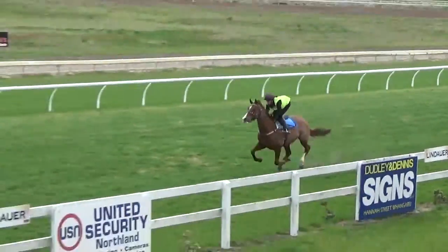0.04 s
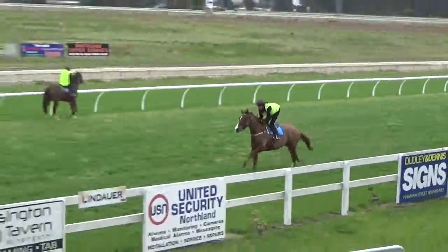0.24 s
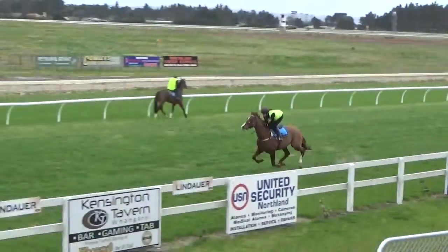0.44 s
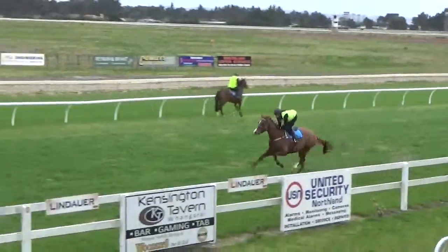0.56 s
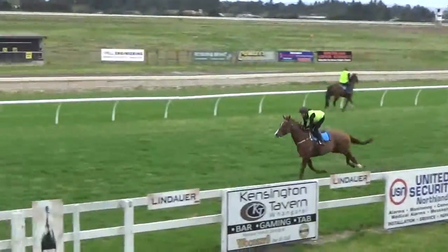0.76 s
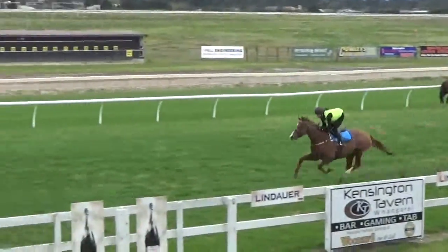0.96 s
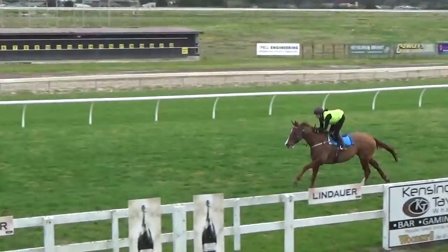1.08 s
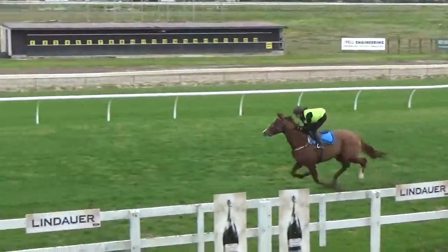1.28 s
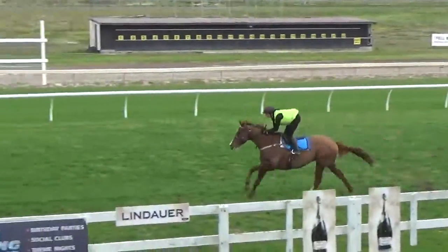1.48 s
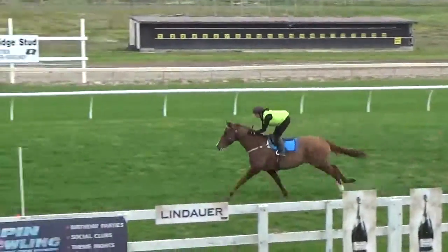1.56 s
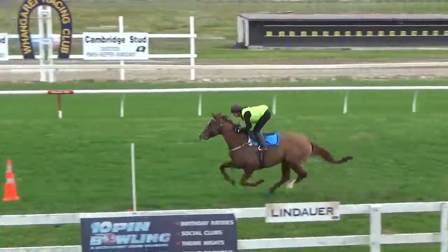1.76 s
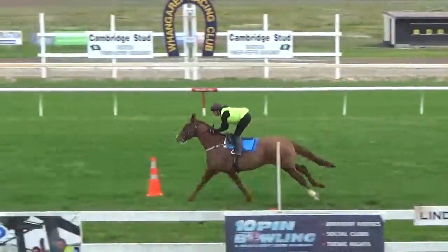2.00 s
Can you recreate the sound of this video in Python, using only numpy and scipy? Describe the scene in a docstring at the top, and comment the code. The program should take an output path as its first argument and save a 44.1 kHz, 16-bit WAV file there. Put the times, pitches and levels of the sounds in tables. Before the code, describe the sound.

A galloping horse's hooves thud and clack on turf, with buffeting wind and twittering birds

```python
"""From the start, wind buffets two microphones as noisy lumps and rumble, with tearing bursts and a roar.
Small birds twitter at once, stronger on the right: gliding whistles over an echoing blur of many calls.
A galloping horse enters with a knock: damped sines thud, ringing taps knock, and noise puffs hoarsely.
A hard clack follows; from about 0.7 s each hoof also swishes more clearly through the grass, as fading noise.
Heavy thuds, knocks and clacks keep coming to the end at two seconds."""
import sys
import numpy as np
from scipy import signal
from scipy.fft import rfft, irfft, next_fast_len
from scipy.io import wavfile
from scipy.ndimage import uniform_filter1d

SR = 44100
rng = np.random.default_rng(int(sys.argv[2]) if len(sys.argv) > 2 else 0)


def convert_level_to_amplitude(level_db):
    """Map a level in decibels to its linear amplitude factor."""
    exponent = np.asarray(level_db, float) / 20
    return 10 ** exponent


def dump_mix(stems):
    """Bounce the given channels to the path in sys.argv[1] as a 16-bit WAV at rate SR."""
    frames = np.atleast_2d(stems).T  # one column per channel
    limited = np.clip(frames, -1, 1)  # hard clip at full scale
    pcm = np.round(limited * 32767).astype(np.int16)
    wavfile.write(sys.argv[1], SR, pcm)


N = 89655  # samples, about 2.03 s


def evened(x):
    """Scales a signal to rms 1."""
    return x / np.sqrt(np.mean(x ** 2) + 1e-20)


def read(points, hz):
    """Reads a frequency table by interpolating over log frequency."""
    f, value = np.transpose(points)
    return np.interp(np.log(hz + 1), np.log(f + 1), value)


def curve(table, column):
    """Turns a level column into a gain envelope, interpolated in dB over time."""
    rows = np.array(table)
    return convert_level_to_amplitude(np.interp(np.arange(N) / SR, rows[:, 0], rows[:, column]))


def add(mix, start_s, sound):
    """Mixes a sound in at its start time, cut off at the end of the mix."""
    part = mix[..., max(round(start_s * SR), 0):][..., :sound.shape[-1]]
    part += sound[..., :part.shape[-1]]


def coloured(x, gain):
    """Filters a sound by a gain given as a function of Hz."""
    size = next_fast_len(x.shape[-1])
    hz = np.fft.rfftfreq(size, 1 / SR)
    return irfft(rfft(x, size) * gain(hz), size)[..., :x.shape[-1]]


# likeness of the two microphones: frequency_hz, likeness (0 to 1)
MIC_LIKENESS = [(30, 0.38), (80, 0.85), (160, 0.39), (320, 0.23), (640, 0.16), (1300, 0.95), (2600, 0.41),
                (5200, 0.42), (11000, 1)]
# how far the left microphone leads the right: frequency_hz, lead_rad
LEFT_LEAD = [(30, 1.4), (120, 0), (260, 0.8), (520, 2.5), (1290, 2.5), (1980, 0.7), (4310, -7), (7580, -9),
             (11100, -12)]


def pair(a, b):
    """Makes left and right from two unrelated signals, as alike at each frequency as the microphones are."""
    def likeness(hz):
        return np.clip(read(MIC_LIKENESS, hz), -1, 1)

    shared = coloured(a, lambda hz: likeness(hz) * np.exp(-1j * read(LEFT_LEAD, hz)))
    separate = coloured(b, lambda hz: np.sqrt(1 - likeness(hz) ** 2))
    return np.array([a, shared + separate])


def hiss(spectrum, patchy_db):
    """Stereo noise of one spectrum, rms 1, whose bands swell and fade in drifting patches."""
    likeness = 0.78  # between left and right, before the patches
    a, b = rng.standard_normal((2, N))
    stereo = np.array([a, likeness * a + np.sqrt(1 - likeness ** 2) * b])
    shaped = coloured(stereo, lambda hz: convert_level_to_amplitude(read(spectrum, hz)))
    bins = signal.stft(shaped, nperseg=512)[2]
    patches = rng.standard_normal(bins.shape[1:])
    patches = uniform_filter1d(patches, size=6, axis=0)  # over frequency
    patches = evened(uniform_filter1d(patches, size=10, axis=1))  # over time
    return evened(signal.istft(bins * convert_level_to_amplitude(patchy_db * patches), nperseg=512)[1][:, :N])


def burst(hz, width_hz, t60_s, tap=6.2):
    """A tap and a short dying noise excite one steep resonance, scaled to peak 1."""
    t = np.arange(4000) / SR
    drive = rng.standard_normal(len(t)) * convert_level_to_amplitude(-60 * t / t60_s)
    drive[0] = tap
    radius = np.exp(-np.pi * width_hz / SR)
    poles = [1, -2 * radius * np.cos(2 * np.pi * hz / SR), radius * radius]
    no_treble = signal.lfilter([1, 1], poles, drive)
    ring = signal.lfilter([1, -1], poles, no_treble)  # second pass, which also blocks DC
    return ring / abs(ring).max()


# hoof falls, levels before the stereo mix: start_s, thud_level_db, knock_level_db, swish_level_db
HOOF_FALLS = [(0.135, -38, -26.5, -64), (.38, -28, -45, -58), (.463, -10.5, -43, -59),
              (0.526, -30, -36, -59), (.553, -18, -39, -59), (.697, -20.5, -51, -40.5),
              (.773, -28, -47, -44), (.788, -12.5, -40, -42), (.911, -25, -44, -40), (0.936, -24, -51, -40),
              (1.11, -16.5, -35, -42), (1.185, -14, -38, -30.5), (1.195, -16.5, -27, -48),
              (1.261, -18.5, -31, -46), (1.338, -20, -35, -54), (1.519, -16.5, -25, -32),
              (1.598, -11, -41, -34.5), (1.6044, -11, -17, -47), (1.673, -17.5, -36, -60),
              (1.702, -16.5, -20, -64), (1.936, -25.5, -41, -31), (2.0179, -14.5, -28, -30)]


def hoof_blows():
    """Each hoof makes the turf thud as a damped sine, with a body resonance and a higher knock."""
    THUD_HZ, THUD_T60_S, THUD_RISE_S = 118, 0.06, 0.0006
    BODY_HZ, BODY_WIDTH_HZ, BODY_DB = 481, 320, -7  # level relative to the thud
    KNOCK_HZ, KNOCK_WIDTH_HZ, STRIKE_T60_S = 940, 640, 0.028
    t = np.arange(4000) / SR
    rise = 1 - np.exp(-t / THUD_RISE_S)
    thud = np.sin(2 * np.pi * THUD_HZ * t) * rise * convert_level_to_amplitude(-60 * t / THUD_T60_S)
    thud /= thud.max()
    blows = np.zeros(N)
    for start_s, thud_db, knock_db, _ in HOOF_FALLS:
        add(blows, start_s, convert_level_to_amplitude(thud_db) * thud)
        add(blows, start_s, convert_level_to_amplitude(knock_db) * burst(KNOCK_HZ, KNOCK_WIDTH_HZ, STRIKE_T60_S))
        add(blows, start_s, convert_level_to_amplitude(thud_db + BODY_DB) * burst(BODY_HZ, BODY_WIDTH_HZ, STRIKE_T60_S))
    return blows


# colour of the grass noise: frequency_hz, relative_level_db (per Hz)
GRASS_COLOUR = [(880, -32), (1500, 4), (3190, -4), (6460, -7), (9880, -2.5), (10900, -4.5), (11400, -79),
                (14800, -55), (22000, -120)]
# legs brushing through the grass, before the patches of hiss: start_s, level_db
LEG_BRUSH = [(0.0, -84), (0.42, -61), (1.01, -57), (1.13, -51.5), (1.26, -54), (1.41, -54), (2.03, -53)]


def grass():
    """Grass noise swishes up just ahead of each hoof and dies away, over a steadier brushing of legs."""
    LEAD_S, T60_S, GRIT_DB = 0.004, 0.055, 2.5
    t = np.arange(4000) / SR
    swish = np.zeros(N)
    for start_s, _, _, swish_db in HOOF_FALLS:
        rise = np.minimum(t / LEAD_S, 1)
        add(swish, start_s - LEAD_S, convert_level_to_amplitude(swish_db - 60 * t / T60_S) * rise)
    steps = rng.standard_normal(N // 64 + 1).repeat(64)[:N]  # a new level every 64 samples
    grit = convert_level_to_amplitude(GRIT_DB * steps)
    return hiss(GRASS_COLOUR, patchy_db=2.5) * (swish * grit + curve(LEG_BRUSH, column=1))


# sharp clacks, perhaps shoe on shoe, levels before the stereo mix:
# start_s, ring_level_db, ring_hz, treble_level_db
SHOE_CLACKS = [(0.3178, -15, 1200, -28), (.381, -31, 1500, -32), (.788, -23.5, 1510, -35),
               (1.185, -27, 2200, -33), (1.6045, -24, 2000, -33), (1.7629, -16, 2430, -23),
               (1.7672, -34, 2430, -29), (2.0164, -18, 2130, -29)]


def clacks():
    """Each clack is a hard tap on a ringing resonance, with a bright tick kept as a separate layer."""
    RING_WIDTH_HZ, TICK_HZ, TICK_WIDTH_HZ, T60_S = 1500, 9800, 4000, 0.016
    rings, ticks = np.zeros((2, N))
    for start_s, ring_db, ring_hz, treble_db in SHOE_CLACKS:
        add(rings, start_s, convert_level_to_amplitude(ring_db) * burst(ring_hz, RING_WIDTH_HZ, T60_S, tap=9))
        add(ticks, start_s, convert_level_to_amplitude(treble_db) * burst(TICK_HZ, TICK_WIDTH_HZ, T60_S))
    return rings, ticks


def horse():
    """Hoof blows and clacks sit near the centre with a little microphone difference, grass around them."""
    rings, ticks = clacks()
    blows = hoof_blows() + rings
    spread = pair(blows, np.zeros(N))
    return 0.14 * spread + 0.85 * blows + ticks + grass()


# hoarse puffs, about one a stride, probably the horse blowing: start_s, length_s, level_db (at the crest)
HORSE_PUFFS = [(0.01, 0.15, -48), (0.398, 0.16, -41), (0.74, 0.14, -39), (0.869, 0.093, -37),
               (1.232, 0.13, -35.5), (1.634, 0.18, -37)]
# colour of the puffs: frequency_hz, relative_level_db (per Hz)
PUFF_COLOUR = [(300, -30), (500, 2.5), (800, -1), (1150, 2), (1600, -4), (2300, -1), (3000, -10),
               (4000, -30)]


def puffs():
    """Each puff is coloured noise that swells and fades along half a sine."""
    level = np.zeros(N)
    for start_s, length_s, db in HORSE_PUFFS:
        swell = np.sin(np.pi * np.arange(0, length_s, 1 / SR) / length_s)
        add(level, start_s, convert_level_to_amplitude(db) * swell)
    return hiss(PUFF_COLOUR, patchy_db=2.5) * level


# wind strength: start_s, rumble_level_db, flutter_level_db, roar_level_db
WIND_LEVELS = [(0.0, -29, -22.5, -39), (0.16, -26, -18, -40.5), (0.23, -21, -24, -40),
               (0.29, -15.5, -17.5, -40.5), (0.32, -16, -25.5, -42.5), (0.36, -48, -15, -39.5),
               (0.57, -20.5, -22.5, -43.5), (0.61, -35, -26, -43), (0.64, -13, -24, -42),
               (0.66, -24.5, -25, -39.5), (0.76, -21.5, -34.5, -40.5), (0.8, -22.5, -17, -39),
               (0.92, -34.5, -28.5, -41), (0.98, -21.5, -30, -42), (1.08, -27.5, -37.5, -40.5),
               (1.49, -25, -30, -36.5), (1.53, -23.5, -37, -39), (1.55, -25, -23, -40),
               (1.6, -18.5, -26, -38), (1.8, -28, -32, -36), (1.99, -33.5, -33, -39), (2.03, -45, -28, -40)]
# colour of the gusts on the microphones: frequency_hz, relative_level_db (per Hz)
GUST_COLOUR = [(12, -44), (20, -28), (59, 0.5), (106, 3.5), (135, -0.5), (205, -1.5), (295, -7.5),
               (844, -33), (900, -28), (1170, -38), (1980, -120)]
# colour of the faint roar above: frequency_hz, relative_level_db (per Hz)
ROAR_COLOUR = [(240, -59), (400, -7), (473, -3.5), (784, -10), (1870, -15.5), (4280, -12), (7820, -28.5),
               (9930, -25), (11400, -36), (14800, -69), (22000, -120)]


def wind():
    """Eddies press on the microphones as lumps over a smooth rumble; a faint roar lies above."""
    LUMPS_PER_S, LUMP_SPREAD_DB, LUMP_SHARE, SPLIT_HZ = 250, 2, 0.45, 152.4
    sizes = convert_level_to_amplitude(LUMP_SPREAD_DB * np.minimum(rng.exponential(1, (2, N)), 4))
    lumps = (rng.random((2, N)) < LUMPS_PER_S / SR) * sizes
    smooth = rng.standard_normal((2, N))
    eddies = LUMP_SHARE * evened(lumps - lumps.mean()) + (1 - LUMP_SHARE) * smooth
    drive = pair(*eddies)

    def upper(hz):
        return hz ** 2 / (hz ** 2 + SPLIT_HZ ** 2)

    rumble = coloured(drive, lambda hz: convert_level_to_amplitude(read(GUST_COLOUR, hz)) * (1 - upper(hz)))
    flutter = coloured(drive, lambda hz: convert_level_to_amplitude(read(GUST_COLOUR, hz)) * upper(hz))
    gusts = evened(rumble) * curve(WIND_LEVELS, column=1) + evened(flutter) * curve(WIND_LEVELS, column=2)
    return gusts + hiss(ROAR_COLOUR, patchy_db=3) * curve(WIND_LEVELS, column=3)


# colour of the tearing bursts: frequency_hz, relative_level_db (per Hz)
TEAR_COLOUR = [(120, -15), (250, 14), (500, 1), (1000, -14), (1600, -19.5), (2500, -58)]


def tearing():
    """Eddies break in bursts of about 10 ms, mostly opposite left to right, following the flutter level."""
    LEVEL_DB, SPREAD_DB, OPPOSITE = -6.5, 7, 0.6  # level relative to the flutter
    a, b = rng.standard_normal((2, N))
    stereo = np.array([a, np.sqrt(1 - OPPOSITE ** 2) * b - OPPOSITE * a])
    swings = uniform_filter1d(rng.standard_normal(N), size=400)
    swings = evened(uniform_filter1d(swings, size=400))
    bursts = coloured(stereo * convert_level_to_amplitude(SPREAD_DB * swings), lambda hz: convert_level_to_amplitude(read(TEAR_COLOUR, hz)))
    return evened(bursts) * convert_level_to_amplitude(LEVEL_DB) * curve(WIND_LEVELS, column=2)


def note(length_s, first_hz, last_hz):
    """A hoarse, warbling whistle that arches around its glide between two nominal pitches."""
    WARBLE, ARCH, FLUTTER = 0.012, 0.018, 0.75  # shares of pitch, pitch and loudness
    u = np.arange(0, length_s, 1 / SR) / length_s
    slow_noise = uniform_filter1d(rng.standard_normal((2, 9000)), size=90)
    wobble, flutter = evened(slow_noise)[:, :len(u)]
    glide_hz = first_hz + (last_hz - first_hz) * u
    hz = glide_hz * (1 + WARBLE * wobble + ARCH * (np.sin(np.pi * u) - 0.7))
    envelope = np.sqrt(2) * np.sin(np.pi * u) ** 0.5 * (1 + FLUTTER * flutter)
    return envelope * np.sin(2 * np.pi * np.cumsum(hz) / SR)


# bird notes, and one faint high hiss near 9.5 kHz; nominal pitches, levels before panning and echo:
# start_s, length_s, first_hz, last_hz, level_db
BIRD_NOTES = [(0, 0.063, 3700, 3740, -44.5), (0.016, 0.031, 4200, 4320, -43),
              (0.172, 0.031, 5900, 5800, -43.5), (0.176, 0.04, 5240, 5360, -47.5),
              (.2, 0.1, 5840, 5000, -47.5), (.235, 0.04, 9540, 9400, -53), (0.233, 0.049, 4245, 4360, -40),
              (.3, 0.03, 3460, 3810, -38.5), (0.322, 0.035, 4370, 4260, -42), (.38, 0.049, 4545, 4260, -40),
              (.46, 0.05, 4700, 3950, -42), (0.485, 0.025, 6860, 6100, -50),
              (0.508, 0.026, 3150, 3300, -46.5), (0.58, 0.026, 5900, 5040, -51),
              (.59, .025, 4450, 4350, -44), (.607, .055, 4150, 2700, -42), (0.65, 0.044, 6030, 5900, -52),
              (0.691, 0.067, 5740, 4920, -40), (0.671, 0.033, 4400, 4210, -44), (.7, 0.04, 3000, 3050, -58),
              (.735, 0.033, 3910, 3554, -40.5), (.895, .025, 4170, 4200, -46),
              (0.79, 0.034, 3604, 3750, -41.5), (0.953, 0.06, 5300, 5400, -56),
              (1.018, 0.073, 5060, 5080, -45), (1.046, 0.061, 3950, 3944, -36.5),
              (1.056, 0.052, 6800, 6740, -51.5), (1.07, 0.092, 4500, 4280, -43),
              (1.117, 0.061, 3630, 2930, -41.5), (1.172, 0.052, 3400, 3140, -41.5),
              (1.177, 0.047, 5100, 5050, -44), (1.229, 0.059, 5050, 5050, -48),
              (1.531, 0.053, 4970, 5000, -48), (1.29, 0.039, 3950, 3860, -43),
              (1.335, .055, 3980, 3495, -41), (1.299, 0.09, 6950, 6530, -53),
              (1.324, .035, 5120, 4930, -51), (1.368, 0.035, 5070, 5050, -38),
              (1.386, 0.032, 3500, 3160, -37.5), (1.41, 0.055, 3500, 3135, -42),
              (1.46, 0.062, 4170, 3480, -45), (1.425, 0.043, 5010, 5040, -43),
              (1.469, 0.066, 5000, 5000, -46), (1.59, 0.036, 4580, 4660, -42),
              (1.688, 0.034, 4920, 5000, -44.5), (1.748, 0.054, 5070, 4970, -41),
              (1.807, 0.067, 4070, 4800, -46), (1.79, 0.028, 5050, 5050, -50),
              (1.885, 0.027, 5020, 5070, -52), (1.89, 0.041, 3580, 2913, -44),
              (1.91, 0.032, 5470, 5600, -54)]


def near_birds():
    """Bird notes, and one faint high hiss near 9.5 kHz, placed one by one as gliding tones."""
    near = np.zeros(N)
    for start_s, length_s, first_hz, last_hz, db in BIRD_NOTES:
        add(near, start_s, convert_level_to_amplitude(db) * note(length_s, first_hz, last_hz))
    return near


def flock(low_hz, high_hz):
    """Many short calls overlap, made by 120 voices of random glide that each repeat at random times."""
    CALLS_PER_S, GLIDE, VOICES = 500, 0.1393, 120
    calls = np.zeros(N)
    for hz in np.geomspace(low_hz, high_hz, num=VOICES):
        starts = rng.random(N) < CALLS_PER_S / VOICES / SR
        strikes = starts * convert_level_to_amplitude(2 * rng.standard_normal(N))
        glide = GLIDE * rng.uniform(-0.997, 0.43)  # most calls fall
        call = note(rng.uniform(0.015, 0.04), hz * (1 - glide), hz * (1 + glide))
        calls += signal.oaconvolve(strikes, call, "same")
    return evened(calls)


# distant flock, before echo and panning: start_s, lower_voices_level_db, higher_voices_level_db
FLOCK_LEVELS = [(0.0, -41.5, -60.5), (0.2, -45.5, -43), (0.44, -48, -55), (.63, -53, -56),
                (0.69, -38.5, -45), (.76, -40.5, -50), (0.84, -47, -60), (1.02, -55, -46), (1.12, -35, -58),
                (1.24, -41, -55), (1.31, -39, -52), (1.45, -37.5, -50), (1.62, -41.5, -55),
                (1.74, -45, -79), (2.03, -47.5, -43.5)]


def far_birds():
    """Lower and higher voices of the flock swell and fade independently."""
    lower = flock(2852, 4700) * curve(FLOCK_LEVELS, column=1)
    higher = flock(4700, 5900) * curve(FLOCK_LEVELS, column=2)
    return lower + higher


def scatter(x):
    """Echoes from fences, stands and trees: sparse taps dying away, different on each side."""
    T60_S = 0.55
    t = np.arange(SR // 2) / SR
    signs = rng.choice([-1., 1.], (2, len(t)))
    present = rng.random((2, len(t))) < 0.04
    taps = signs * present * convert_level_to_amplitude(-60 * t / T60_S)
    return signal.fftconvolve(x[None], taps / np.linalg.norm(taps[0]), axes=1)[:, :N]


def birds():
    """Near notes and the far flock with their echoes, stronger on the right."""
    ECHO_DB, PAN_DB = -4, -8  # near echo relative to its notes; left relative to right
    near, far = near_birds(), far_birds()
    both = near + 0.76 * far + convert_level_to_amplitude(ECHO_DB) * scatter(near) + 0.96 * scatter(far)
    both[0] = np.roll(both[0], -1)  # left is one sample early
    return both * convert_level_to_amplitude(np.array([[PAN_DB / 2], [-PAN_DB / 2]]))


def scene():
    """Horse in front, then wind, then birds."""
    return horse() + puffs() + wind() + tearing() + birds()


# overall band edges of the mix: frequency_hz, gain_db
BAND_EDGES = [(8, -42), (25, 5), (45, -2), (11050, -1), (11250, -38), (12000, -12), (12300, -90)]


def band_limited(x):
    """Rolls off the deepest bass and the top treble."""
    return coloured(x, lambda hz: convert_level_to_amplitude(read(BAND_EDGES, hz)))


def roll_off(x):
    """The treble ends steeply here."""
    return signal.sosfilt(signal.butter(12, 11570, fs=SR, output="sos"), x)


def record(dry):
    """Limits the band of the mix and finishes it."""
    mix = band_limited(dry)
    return roll_off(mix)


dry = scene()
out = record(dry)
dump_mix(out)
```